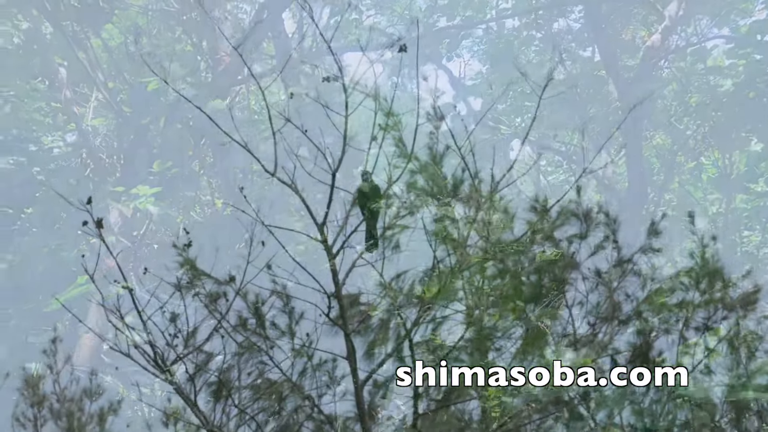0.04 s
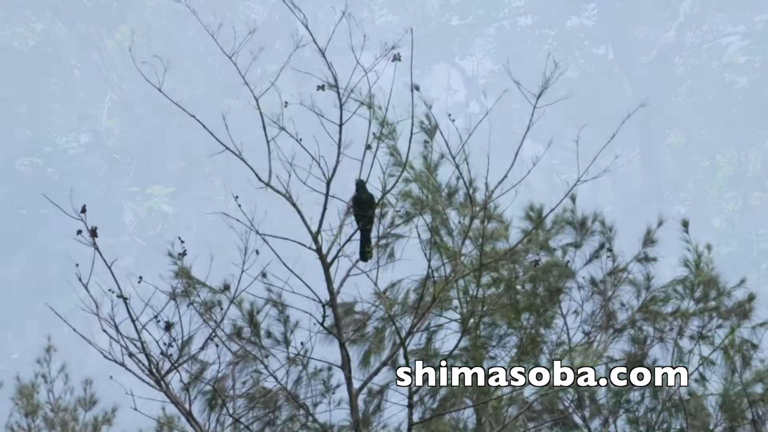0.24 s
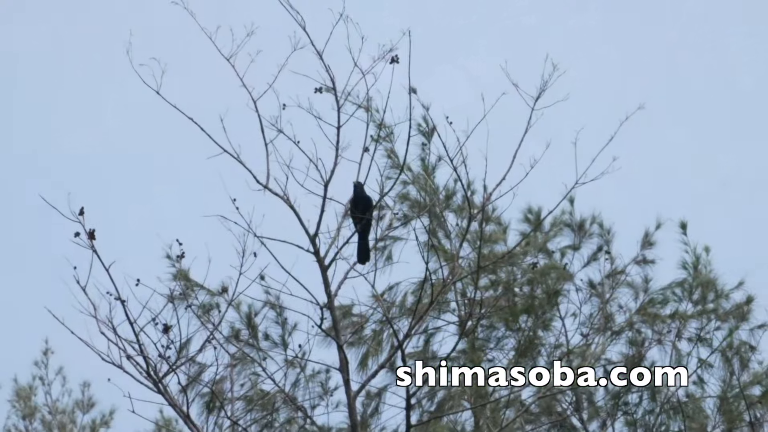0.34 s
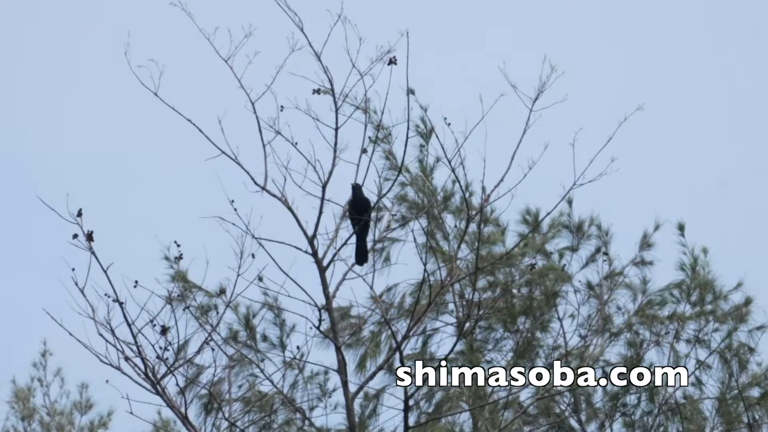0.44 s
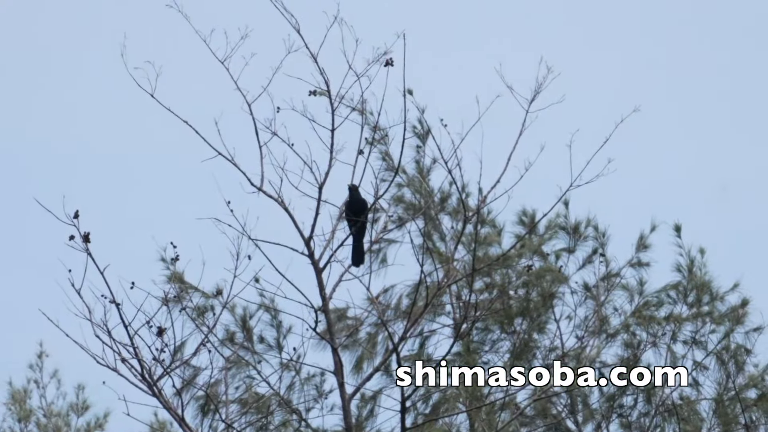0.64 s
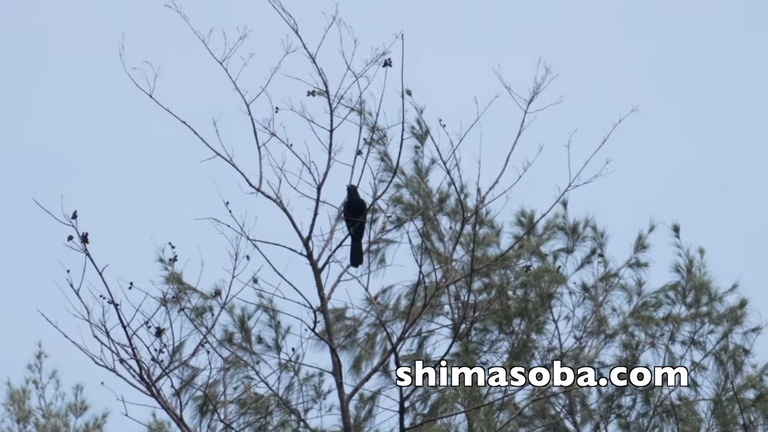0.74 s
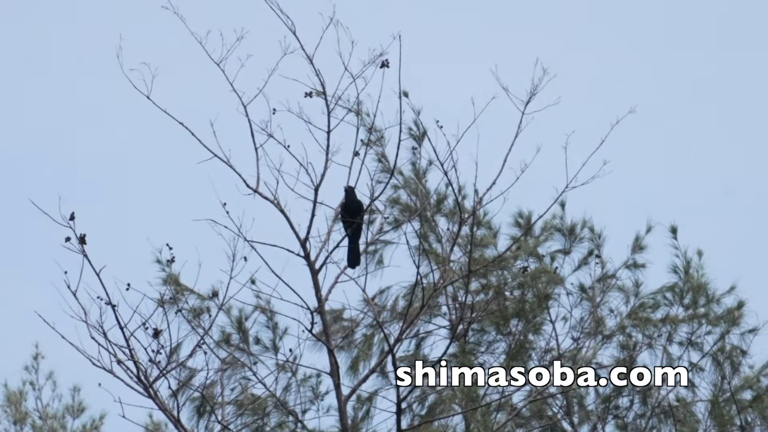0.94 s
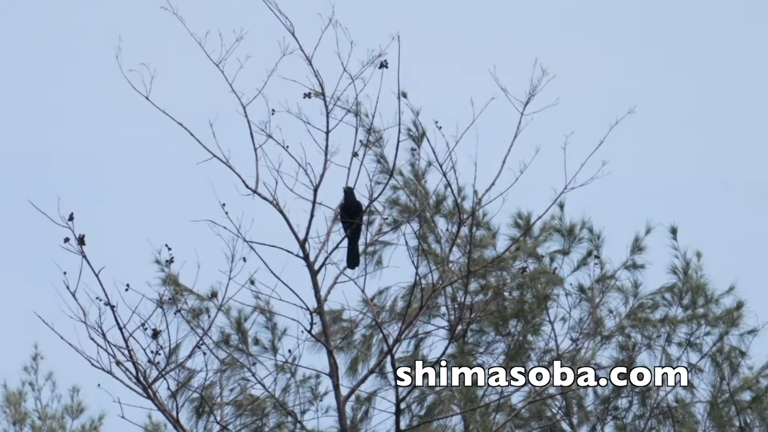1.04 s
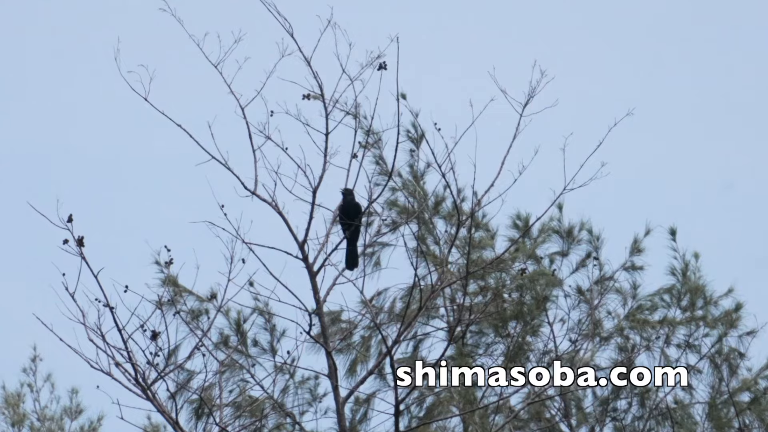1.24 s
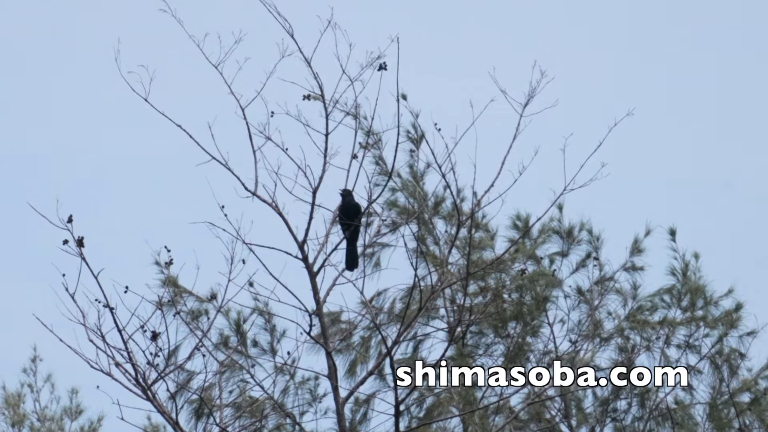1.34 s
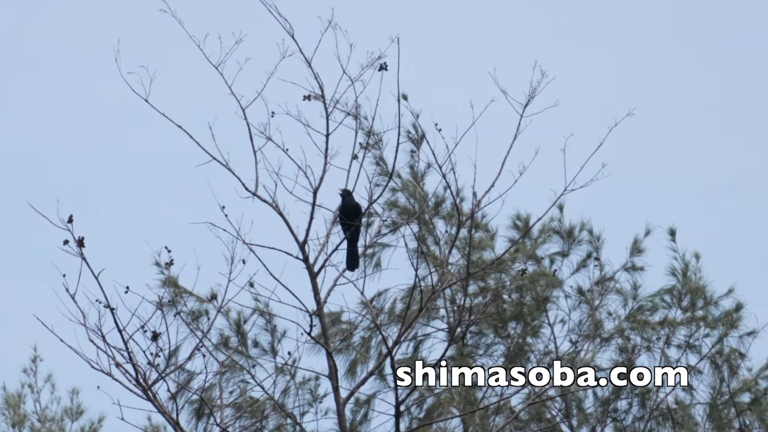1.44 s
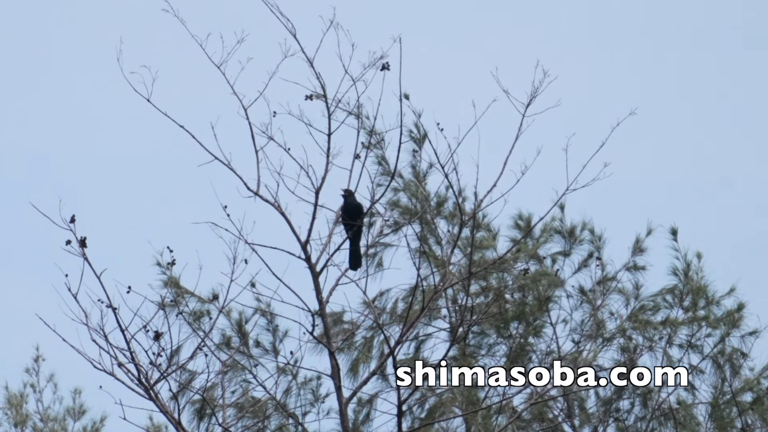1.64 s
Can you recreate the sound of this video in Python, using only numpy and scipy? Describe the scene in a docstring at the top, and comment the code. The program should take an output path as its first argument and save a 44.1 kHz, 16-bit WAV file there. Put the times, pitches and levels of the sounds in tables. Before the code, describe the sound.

One long bird whistle rises and falls outdoors, with soft cheeps and buzzing insects behind.

```python
"""Among trees in still air, a koel gives one drawn-out, rising and falling whistle from a treetop.
The tone is nearly pure; its reflections from the trees interfere with it as the pitch moves.
A small bird cheeps about four times a second. Three insects buzz high in the treble, their rapid
strokes filtered by their bodies, and a soft, low patter runs on over a faint hush.
At the very end the koel starts its next whistle."""
import sys
import numpy as np
from scipy import signal
from scipy.fft import rfft, irfft
from scipy.io import wavfile
from scipy.ndimage import uniform_filter1d

SR = 44100
rng = np.random.default_rng(int(sys.argv[2]) if len(sys.argv) > 2 else 0)


def to_wav(s):
    """Save 16-bit WAV."""
    ch = np.atleast_2d(s).T  # columns
    pcm = np.round(np.clip(ch, -1, 1) * 32767)  # PCM
    wavfile.write(sys.argv[1], SR, pcm.astype(np.int16))


N = 74970
t = np.arange(N) / SR


def undb(db):
    """Amplitude ratio of a level in decibels."""
    return 10 ** (np.asarray(db) / 20)


def unit(x):
    """Normalisation to rms 1."""
    return x / np.sqrt(np.mean(x ** 2))


def curve(rows, column=1):
    """Linear interpolation of one table column in time."""
    rows = np.array(rows)
    return np.interp(t, rows[:, 0], rows[:, column])


def colour(x, response):
    """Spectral shaping by a magnitude response of (f/Hz, gain/dB) points."""
    hz, db = np.array(response).T
    f = np.maximum(np.fft.rfftfreq(N, 1 / SR), 1)
    return irfft(rfft(x) * undb(np.interp(np.log(f), np.log(hz), db)), N)


def drift(rate_hz):
    """Low-pass noise: a smooth random fluctuation of rms 1."""
    width = max(int(SR / rate_hz), 1)
    smoothed = uniform_filter1d(rng.standard_normal(N), width, mode="wrap")
    return unit(uniform_filter1d(smoothed, width, mode="wrap"))


def pan(db):
    """Interaural level difference at constant power; pan/dB is left minus right."""
    gains = undb(np.array([db, -db]) / 2).reshape(2, -1)
    return gains / np.sqrt(np.mean(gains ** 2, axis=0))


def ears(x, lag_s):
    """Interaural time difference: the left ear hears the sound later."""
    return np.array([np.interp(t - lag_s, t, x), x])


def foliage(x, t60_s):
    """Diffuse scattering by leaves and branches: an exponential decay, different at each ear."""
    decay = np.exp(-np.log(1000) * t / t60_s)
    onset = 1 - np.exp(-t / 0.003)
    tail = rng.standard_normal((2, N)) * decay * onset
    return signal.fftconvolve(x[None], unit(tail) / np.sqrt(N), axes=1)[:, :N]


# Spectrum of the still air: f/Hz, relative level/dB
AIR_SPECTRUM = [(25, -33), (42, -15), (62, -9.5), (140, -2), (280, -3), (500, 2.5), (900, -5), (1300, -4.5),
                (1900, -11.5), (2800, -18.5), (5000, -18), (8000, -21.5), (11000, -32), (15000, -52)]
# Its stereo width: f/Hz, side minus mid/dB
AIR_WIDTH = [(30, -28), (60, -31), (130, -11.5), (700, -7.5), (2000, 0.5), (8000, 3)]

def air(level_db=-64):
    """Partial coherence: a broadband hush, alike at both ears in the bass and wide in the treble."""
    mid, side = (unit(colour(rng.standard_normal(N), AIR_SPECTRUM)) for _ in range(2))
    side = colour(side, AIR_WIDTH)
    return undb(level_db + 0.36 * drift(6.5)) * np.array([mid + side, mid - side])


# Swell of a rustle: peak t/s, 1/e half-width/s, peak level/dB, pan/dB
RUSTLE_SWELL = (3, 0.86, -60, 2)
# Its spectrum: f/Hz, relative level/dB
RUSTLE_SPECTRUM = [(4500, -30), (6200, -4), (7500, -10), (8600, -3), (9500, 0), (12000, -14), (15000, -15)]

def rustle(peak_s, half_width_s, peak_db, pan_db):
    """High noise under a Gaussian envelope; only its faint onset is heard before the scene ends."""
    swell = np.exp(-((t - peak_s) / half_width_s) ** 2)
    hiss = np.array([unit(colour(rng.standard_normal(N), RUSTLE_SPECTRUM)) for _ in range(2)])
    return undb(peak_db) * pan(pan_db) * swell * hiss


# Spectrum of the patter: f/Hz, relative level/dB
PATTER_SPECTRUM = [(40, -70), (200, -30.5), (330, -23), (440, -3.5), (560, -2), (680, 3), (790, -8.5),
                   (950, -13.5), (1400, -34)]
# Its envelope: t/s, level/dB
PATTER_ENVELOPE = [(0, -78), (.03, -54.5), (.18, -58), (.38, -54), (.45, -58), (.65, -55), (.78, -63),
                   (.9, -58), (1.1, -58.5), (1.38, -68), (1.53, -61.5), (1.7, -68)]

def patter(ticks_per_s=480, spread_db=2.07, side_db=-12.5):
    """Shot noise: random impulses of uneven size, band-limited into soft, hollow ticks."""
    impulses = (rng.random(N) < ticks_per_s / SR) * np.sign(rng.standard_normal(N))
    sizes = undb(spread_db * rng.exponential(size=N))
    mid = unit(colour(impulses * sizes, PATTER_SPECTRUM))
    side = undb(side_db) * unit(colour(rng.standard_normal(N), PATTER_SPECTRUM))
    return np.array([mid + side, mid - side]) * undb(curve(PATTER_ENVELOPE))


def insect(body, envelope, stroke_hz, roughness, rise_hz_per_s=0):
    """Source and filter: periodic strokes give harmonics and a pulsing scrape, shaped by the body."""
    rate_waver, stroke_depth, swell_db = 0.000378, 0.18, 1.9
    shimmer_hz, shimmer_db, shimmer_cycles = 3.34, 4.5, 0.094
    strokes = np.cumsum(stroke_hz * (1 + rate_waver * drift(10.9))) / SR
    body_hz, body_db = np.array(body).T
    tuning_hz = rise_hz_per_s * (t - t.mean())
    sides = []
    for _ in range(2):
        fade, wander = drift(shimmer_hz), drift(shimmer_hz)
        offsets = rng.random(size=(200, 2))
        harmonics = np.zeros(N)
        for k in range(int(body_hz[0] / stroke_hz), int(body_hz[-1] / stroke_hz)):
            # each harmonic fades in its own time on its way through the leaves
            shift, start_cycles = int(offsets[k, 0] * N), offsets[k, 1]
            db = np.interp(k * stroke_hz - tuning_hz, body_hz, body_db)
            db += shimmer_db * np.roll(fade, shift)
            cycles = k * strokes + start_cycles + shimmer_cycles * np.roll(wander, shift)
            harmonics += undb(db) * np.sin(2 * np.pi * cycles)
        scrape = rng.standard_normal(N) * (1 + stroke_depth * np.cos(2 * np.pi * strokes))
        sides.append(unit(unit(harmonics) + roughness * unit(colour(scrape, body))))
    amplitude = undb(curve(envelope) + swell_db * drift(14))
    return np.array(sides) * amplitude * pan(curve(envelope, column=2))


# Body resonances of the three insects: f/Hz, gain/dB
BUZZ_RESPONSE = [(8300, -51), (8950, -15), (9300, -4), (9560, -4), (9800, -2.5), (10050, -8.5),
                 (10450, -16.5), (10900, -49)]
SHRILL_RESPONSE = [(11600, -35), (12050, -13), (12350, -18), (12850, -4), (13080, -10), (13350, -28),
                   (13700, -13), (13950, 0), (14300, -5), (14700, -14), (15250, -15), (15580, -4),
                   (15900, -22)]
RASP_RESPONSE = [(9800, -30), (10700, -9), (11350, 0), (11900, -12), (12450, -6), (13100, -20),
                 (13600, -35)]
# Their envelopes: t/s, level/dB, pan/dB
BUZZ_ENVELOPE = [(0, -60, -1.5), (.21, -54, 0), (.36, -58, -1.5), (.63, -55.5, 6.5), (.78, -61, -5),
                 (.93, -54.5, 2), (1.06, -62, 8), (1.41, -61, 4), (1.7, -60, 10)]
SHRILL_ENVELOPE = [(0, -68, 8.7), (.22, -63.5, 26), (.6, -75.5, 25), (1.15, -76.5, 8.4), (1.38, -61.5, 26),
                   (1.7, -61, 42)]
RASP_ENVELOPE = [(0, -65, 2.6), (.35, -61, 4.7), (.65, -68, 11), (.93, -71.5, 4.9), (1.1, -75.5, 4.3),
                 (1.7, -78, 3.1)]

def insects():
    """Incoherent sources add in power: a buzz, a shriller insect on the left and a fading rasp."""
    buzz = insect(BUZZ_RESPONSE, BUZZ_ENVELOPE, stroke_hz=122.07, roughness=0.6, rise_hz_per_s=230)
    shrill = insect(SHRILL_RESPONSE, SHRILL_ENVELOPE, stroke_hz=130, roughness=4.6)
    rasp = insect(RASP_RESPONSE, RASP_ENVELOPE, stroke_hz=109.5, roughness=2)
    return buzz + shrill + rasp


def note(start_s, hz, length_s, db, glide_hz_per_s):
    """Quadratic chirp: a slightly unsteady tone holds its pitch, then slides ever faster."""
    attack_s, release_s, waver, flutter_db = 0.012, 0.017, 0.01104, 2.5
    age = t - start_s
    slide_hz = glide_hz_per_s * length_s * np.clip(age / length_s, 0, 1) ** 2
    pitch = (hz + slide_hz) * (1 + waver * drift(410))
    envelope = np.clip(age / attack_s, 0, 1) * np.clip((length_s - age) / release_s, 0, 1)
    return undb(db + flutter_db * drift(120)) * envelope * np.sin(2 * np.pi * np.cumsum(pitch) / SR)


# Faint bird notes and, at the very end, the start of the koel's next whistle:
# t/s, starting f/Hz, duration/s, level/dB, mean glide/(Hz/s), pan/dB
FAINT_NOTES = [(0.059, 5680, 0.1, -66, -2000, -2), (0.084, 4050, 0.087, -73.5, -1000, -11),
               (0.751, 4510, 0.066, -73, -6000, 4), (1.276, 1814, 0.16, -65, -400, 29),
               (1.679, 1323, 0.058, -57, 3500, -11)]

def faint_notes():
    """Reverberation: faint bird notes and the koel's next onset, about as strong scattered as direct."""
    direct = sum(pan(pan_db) * note(*row) for *row, pan_db in FAINT_NOTES)
    return direct + foliage(direct.mean(axis=0), t60_s=0.16)


# Cheeps of the small bird: t/s, starting f/Hz, duration/s, level/dB
CHEEP_NOTES = [(0.03, 5346, 0.085, -59), (0.299, 5300, .07, -57), (0.545, 5310, 0.1, -59.5),
               (0.81, 5333, 0.082, -55.5), (1.093, 5285, 0.069, -55.5), (1.37, 5270, 0.0706, -57),
               (1.623, 5256, 0.068, -57)]

def small_bird(pan_db=-2, reverb_db=-1.5):
    """Frequency modulation: regular falling cheeps, blurred by scattering in the leaves."""
    cheeps = sum(note(*row, glide_hz_per_s=-4300) for row in CHEEP_NOTES)
    reverb = undb(reverb_db) * foliage(cheeps, t60_s=0.23)
    return pan(pan_db) * (ears(cheeps, lag_s=0.00004) + reverb)


# Reflection by thin trunks and twigs: f/Hz, gain/dB
TREE_RESPONSE = [(1000, -13), (1300, -8), (1490, 0), (3000, 0)]
# Echo paths from single trees: delay/s, gain/dB, pan/dB
TREE_PATHS = [(.012, -13.5, -2), (.034, -12.5, -11), (.066, -8.5, 14), (.091, -11, -2),
              (.143, -17.5, -11.5), (.178, -21.5, 8), (.21, -29, -13)]

def tree_echoes(call, reverb_db=-13):
    """Scattering: thin trunks and twigs return short wavelengths best, as echoes and a diffuse tail."""
    scattered = colour(call, TREE_RESPONSE)
    echoes = sum(undb(db) * pan(pan_db) * np.interp(t - delay_s, t, scattered)
                 for delay_s, db, pan_db in TREE_PATHS)
    return echoes + undb(reverb_db) * foliage(scattered, t60_s=0.38)


# Fundamental of the whistle: t/s, f/Hz
KOEL_FUNDAMENTAL = [(.178, 1322), (.2, 1308), (.228, 1216), (.262, 1236), (.33, 1256), (.425, 1304),
                    (.47, 1378), (.512, 1456), (.55, 1510), (.572, 1494), (.6, 1400), (.638, 1280),
                    (.68, 1172), (.725, 1098), (.79, 1005)]
# Its envelope: t/s, level/dB
KOEL_ENVELOPE = [(.168, -80), (.19, -47), (.205, -41), (.235, -46.5), (.255, -42), (.295, -43.5),
                 (.328, -36), (.375, -40.5), (.405, -34), (.47, -37.5), (.505, -33.5), (.568, -34.5),
                 (.595, -38), (.635, -36.5), (.67, -45), (.755, -50), (.77, -65), (.795, -54)]
# Its overtones at full effort: harmonic number, level/dB re the fundamental
KOEL_HARMONICS = [(2, -36), (3, -36.5), (5, -42)]

def koel(waver=0.0028, pan_db=-2.5):
    """Interference: a gliding whistle, with faint overtones when loud, beats against its own echoes."""
    hz = uniform_filter1d(curve(KOEL_FUNDAMENTAL), size=500) * (1 + waver * drift(170))
    phase = 2 * np.pi * np.cumsum(hz) / SR
    sounding = (t > KOEL_ENVELOPE[0][0]) & (t < KOEL_ENVELOPE[-1][0])
    amplitude = undb(curve(KOEL_ENVELOPE)) * sounding
    effort = amplitude / amplitude.max()
    overtones = sum(undb(db) * np.sin(k * phase) for k, db in KOEL_HARMONICS)
    call = np.sqrt(2) * amplitude * (np.sin(phase) + effort ** 3 * overtones)
    direct = pan(pan_db) * ears(call, lag_s=0.00009)
    return direct + tree_echoes(call)


def scene():
    """Superposition: the pressures of birds, insects and background add at each ear."""
    birds = koel() + small_bird() + faint_notes()
    return birds + insects() + patter() + air() + rustle(*RUSTLE_SWELL)


def record(dry, cutoff_hz=15750):
    """Band limiting: an elliptic low-pass filter cuts the highest treble steeply."""
    return signal.sosfilt(signal.ellip(10, .2, 80, cutoff_hz, fs=SR, output="sos"), dry)


dry = scene()
out = record(dry)
to_wav(out)
```